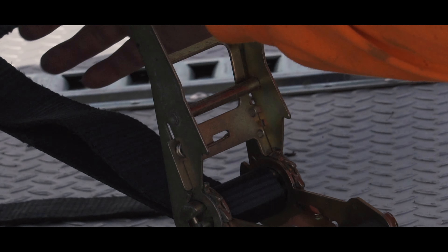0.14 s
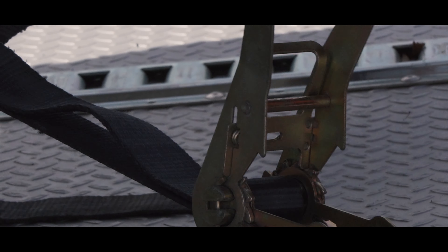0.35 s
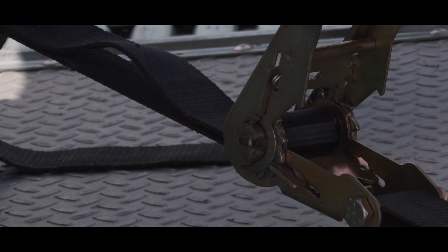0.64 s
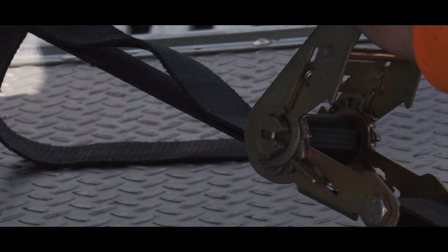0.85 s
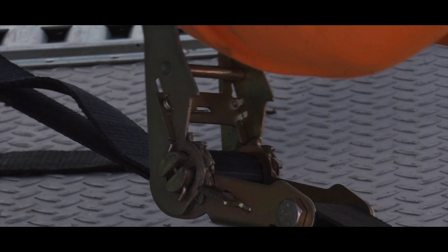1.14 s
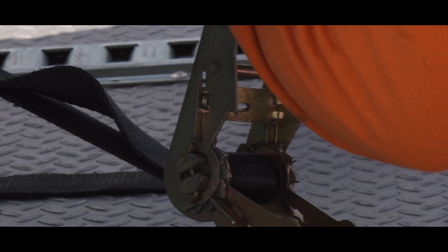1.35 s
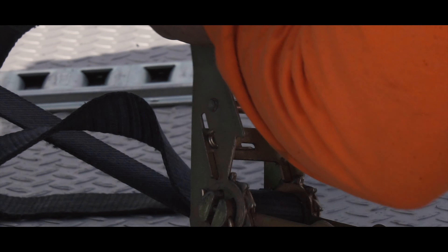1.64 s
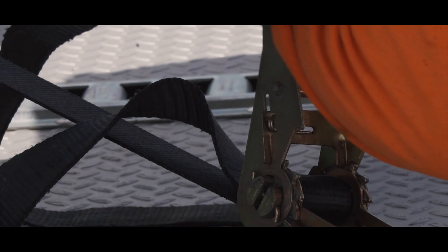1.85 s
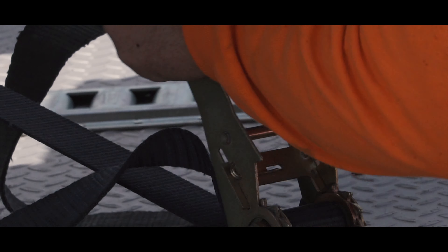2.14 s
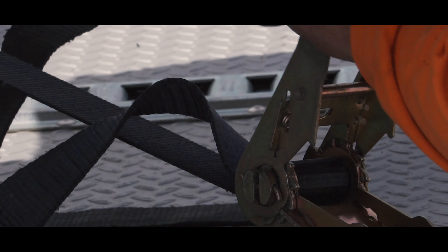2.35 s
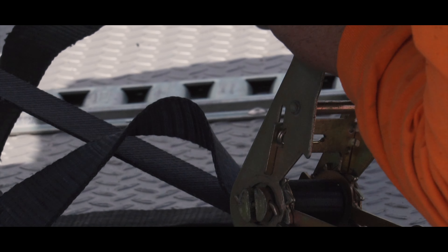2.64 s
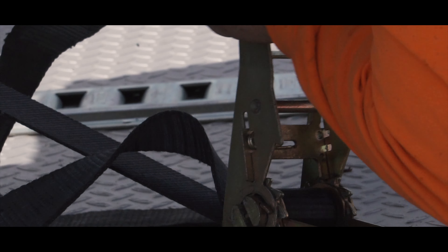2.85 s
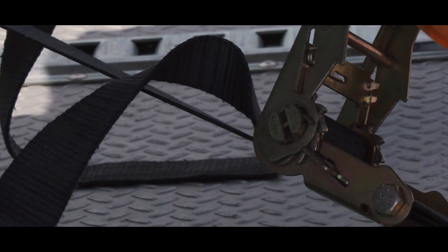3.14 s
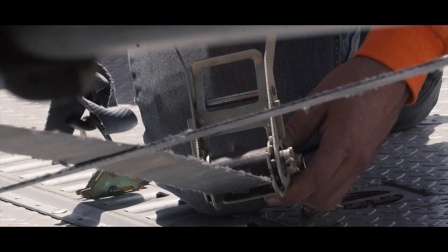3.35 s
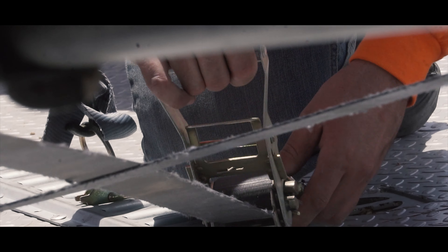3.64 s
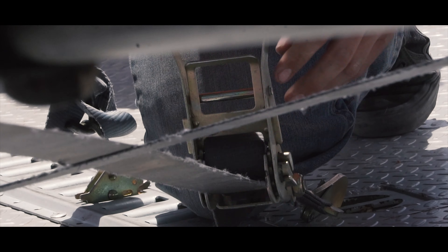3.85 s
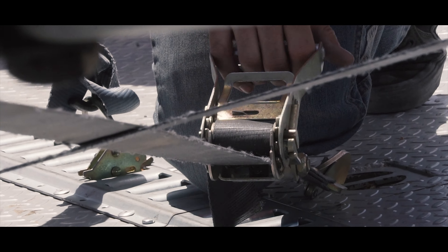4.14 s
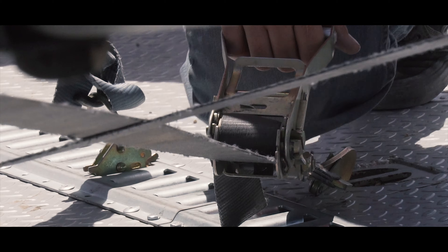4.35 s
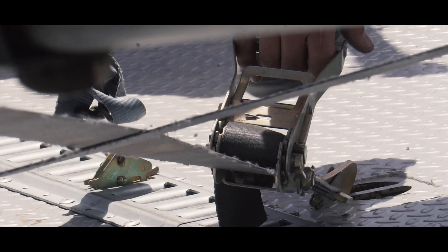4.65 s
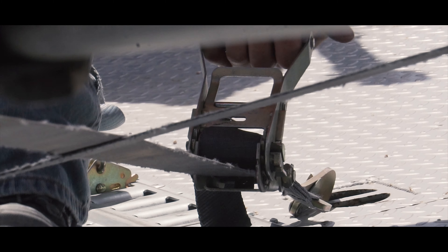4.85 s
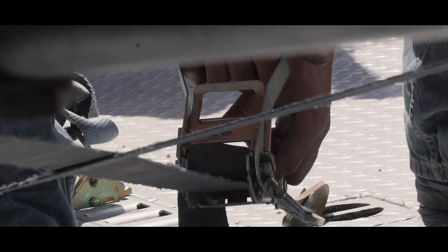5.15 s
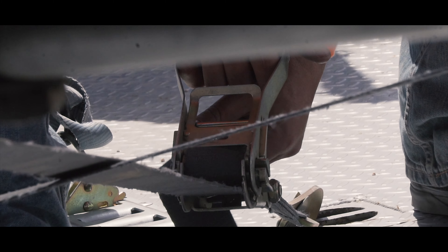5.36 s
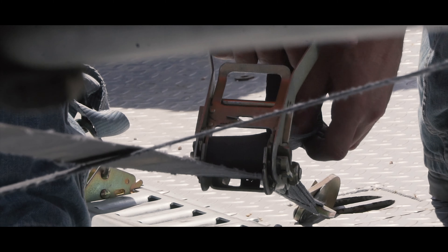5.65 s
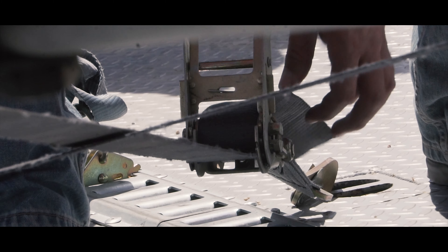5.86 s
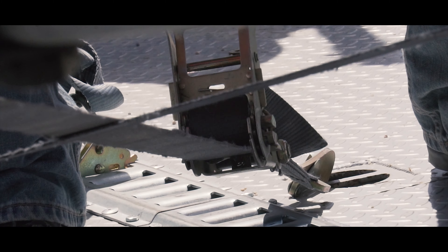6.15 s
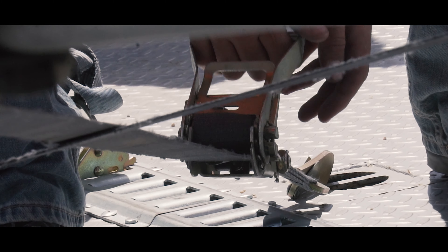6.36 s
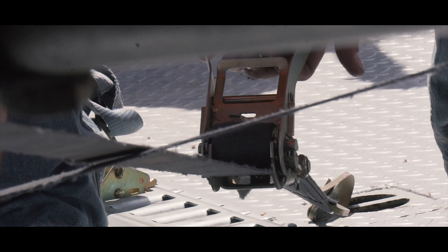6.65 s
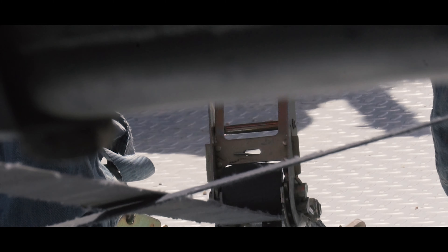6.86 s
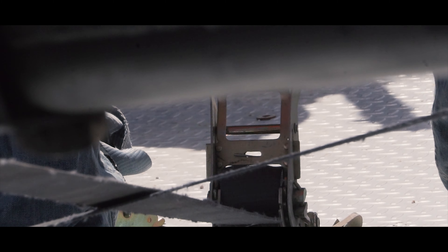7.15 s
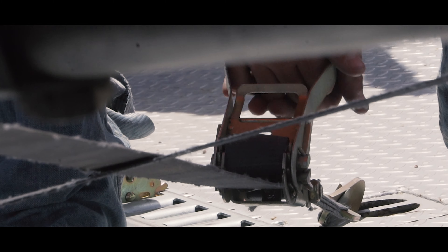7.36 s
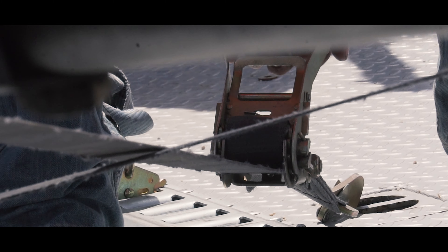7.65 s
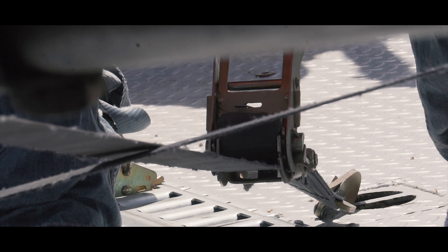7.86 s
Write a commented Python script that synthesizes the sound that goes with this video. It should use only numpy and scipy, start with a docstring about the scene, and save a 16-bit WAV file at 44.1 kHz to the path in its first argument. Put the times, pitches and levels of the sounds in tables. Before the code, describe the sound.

Outdoors in strong low wind buffeting, a close ratchet clatters, squeaks and clanks, then after a pop a second ratchet clicks more sparsely.

```python
"""On the steel deck of a trailer in a windy yard, two ratchet straps are cranked tight, one after the other.
Pawls (sprung catches) chatter over teeth: random bursts excite decaying tones and noise for the steel frames.
Squeaks are gliding tones, webbing creaks and rasps are tiny random slips, and sheet metal clanks.
Shaped noise makes the wind, with its gusts, lulls and thumps, a soft rustling and the distant yard."""
import sys
import numpy as np
from scipy import signal
from scipy.fft import rfft, irfft, next_fast_len
from scipy.io import wavfile
from scipy.ndimage import uniform_filter1d

SR = 44100
rng = np.random.default_rng(int(sys.argv[2]) if len(sys.argv) > 2 else 0)


def to_wav(sig):
    """Store sig (one row per channel, or 1-D mono) as 16-bit WAV at the path in sys.argv[1].

    Samples outside -1..1 are clipped; the rate is SR.
    """
    pcm = np.clip(np.atleast_2d(sig), -1, 1) * 32767
    pcm = np.round(pcm).astype(np.int16)
    wavfile.write(sys.argv[1], SR, pcm.T)  # frames by channels


N = 353682
TIME = np.arange(N) / SR
RING = TIME[:SR // 2]  # the half second given to each struck sound
TOP_HZ = 15850  # the treble is cut above this
DRAG_LEAD_S, DRAG_S = .008, 0.035  # the pawl drags over the teeth from just before each blow until after it
# eddy level at a given wind strength, and the dB that eddies gain per dB of wind
EDDY_DB, AT_WIND_DB, EDDY_GROWTH = -27, -15, 1.37

# base strength of the slow wind pressure: time_s, relative_level_db
WIND = [(0.0, -15), (0.42, -17), (0.59, -15.5), (1.1, -23), (1.2, -9), (1.49, -13.5), (1.74, -9.5),
        (3.29, -7), (3.34, -20), (3.8, -13.5), (4.45, -15.5), (4.83, -13.5), (5.31, -14.5), (5.98, -17),
        (6.52, -15), (7.13, -10), (7.8, -17), (8.02, -11.5)]
# gusts and lulls on top: crest_s, length_s, pressure_change_db, eddies_change_db
GUSTS_AND_LULLS = [(0.344, 0.56, 9.5, 12.5), (.95, 0.11, 2.5, 14.5), (1.457, 0.27, 2, -2),
                   (2.0, 0.15, -1.5, 6.5), (2.365, 0.18, 1, 6.5), (2.607, 0.18, 5, 1), (2.835, 0.086, 2, 4),
                   (3.13, .22, -4.5, 7.5), (3.573, 0.28, 2.5, 10), (4.25, 0.23, 4, -4),
                   (4.72, 0.58, 4.5, 5.5), (5.556, 0.25, 9.5, 13.5), (6.145, 0.24, 10, 7.5),
                   (6.47, 0.49, 3.5, 7.5), (7.02, 0.29, 4, 5), (7.612, 0.33, 2.5, 9), (7.99, 0.43, 4, 7.5)]
# tone of the slow, large eddies: pitch_hz, level_db
BUFFET = [(3, -26), (10, -1), (20, 1), (34, -2.5), (50, -7.5), (70, -18), (16000, -200)]
# tone of the small eddies: pitch_hz, level_db
EDDIES = [(30, -18), (60, -1), (85, 0), (125, -8), (300, -23), (450, -33), (16000, -122)]
# tone of the distant yard: pitch_hz, level_db
YARD = [(180, -20), (340, -6), (502, -13.5), (1150, -14), (1850, -27), (2650, -21), (3700, -32.5),
        (4800, -36.5), (7500, -51), (16000, -53.5)]
# loudness of the yard, before it wavers: time_s, level_db
YARD_LEVEL = [(0, -35.5), (3.25, -37.5), (3.35, -42), (8, -44)]
# blows of the nearer pawl: start_s, relative_peak_db, relative_treble_db, favoured_pitch_hz
NEAR_BLOWS = [(.063, -35, -1, 3220), (.117, -26, -13.5, 2940), (.165, -39.5, -7, 3830),
              (.405, -30, 6, 5300), (.456, -29.5, -2, 5100), (.523, -31.5, -14, 4500),
              (1.125, -37, -3, 3480), (1.16, -18.5, -9.5, 2340), (1.23, -19, -19, 2580),
              (1.238, -16, -5, 3030), (1.244, -11, -1.5, 3240), (1.317, -18.5, -9, 2300),
              (1.324, -26, -6, 3030), (1.391, -23, -5, 2700), (1.429, -24, -11, 4530),
              (1.561, -11.5, -1.5, 3800), (1.647, -29.5, -11.5, 2530), (1.713, -30.5, -7, 2450),
              (1.753, -10, -3.5, 3240), (1.869, -30.5, 1.5, 2800), (1.919, -22, -0.5, 3250),
              (1.951, -29, -3, 2350), (2.033, -11.5, -1, 3200), (2.13, -29, -4.5, 4080),
              (2.221, -22, -2, 3170), (2.228, -12, -5, 5350), (2.317, -31.5, -4.5, 3500),
              (2.335, -25.5, -1, 2960), (2.365, -24.5, -13.5, 3600), (2.466, -13.5, -0.5, 3220),
              (2.699, -27.5, -1, 2900), (2.992, -13, -2.5, 3400), (3.007, -19.5, -13, 2900),
              (3.121, -23, -7.5, 3000), (3.189, -33, -10, 3100)]
# blows of the farther pawl: start_s, relative_peak_db, relative_treble_db, favoured_pitch_hz
FAR_BLOWS = [(3.297, -25, 0.5, 5000), (3.393, -44, -9, 2980), (3.478, -37.5, -2, 4370),
             (3.494, -28.5, -6, 4500), (3.504, -23.5, -4.5, 2700), (3.605, -35.5, -7, 3240),
             (3.626, -27.5, -11, 4500), (3.635, -26, -2.5, 2700), (3.805, -34.5, -9.5, 3060),
             (3.978, -44.5, -18, 2800), (4.065, -18.5, -5, 2840), (4.135, -23.5, 1, 3430),
             (5.083, -31, -5.5, 2670), (5.106, -25.5, -19.5, 2830), (5.327, -36, -5.5, 3570),
             (5.422, -42.5, -4, 4430), (5.675, -39, -9, 4570), (5.698, -29, -2.5, 3130),
             (5.918, -40.5, -10, 3700), (5.947, -32.5, -3, 2840), (5.965, -28, -6.5, 2700),
             (6.202, -37.5, -16, 3650), (6.43, -27.5, -12, 2600), (6.442, -20.5, -6.5, 3100),
             (6.677, -39, -9, 4000), (6.719, -43, -12, 4800), (6.957, -36.5, -8, 3460),
             (6.976, -25.5, -9, 2750), (6.991, -29.5, -12, 2970), (7.136, -39, -6, 3250),
             (7.325, -46.5, -5, 2860), (7.458, -22.5, -3.5, 4470), (7.647, -45, -11, 4600),
             (7.667, -36, -11, 2040), (7.705, -40.5, -15, 3560)]
# strong rings (modes) of each frame, before chance varies them: pitch_hz, level_db, fall_by_60_db_s
NEAR_MODES = [(1202, 2.5, 0.057), (2372, 5.5, 0.054), (2558, 4.5, 0.051), (2860, 1, 0.086),
              (3143, -2, 0.083), (4400, -7.5, 0.096), (5230, -2.5, 0.055), (9600, -0.5, 0.042),
              (11430, 2.5, 0.033), (13000, 8, 0.026)]
FAR_MODES = [(2050, -9.5, .14), (2720, 1, 0.1), (2928, 4.5, 0.056), (3157, 1.5, .07), (3470, -6.5, 0.089),
             (4580, 0, 0.093), (5060, -2.5, 0.1), (7850, -5, 0.088), (10480, 2, 0.039), (12420, 3, 0.042)]
# tone of the dense, quickly fading rest of each frame: pitch_hz, level_db
NEAR_CRACK = [(300, -6), (1000, -23.5), (1900, -7.5), (3000, 5), (5300, 3), (6800, -2.5), (9000, -3.5),
              (12700, -6), (16000, -10)]
FAR_CRACK = [(300, -29), (1000, -37), (1700, -15), (2900, 5.5), (3700, 0), (5000, -1), (7000, -8),
             (9000, -8.5), (13000, -9.5), (16000, -20)]
# the nearer handle swinging back and scraping over its wheel: start_s, length_s, level_db
NEAR_SCRAPES = [(.342, 0.105, -31.5), (1.25, 0.051, -37.5), (1.33, 0.2, -46), (1.69, 0.02, -33.5),
                (1.738, 0.039, -40), (1.865, 0.059, -35.5), (2.15, 0.14, -34.5), (2.315, 0.025, -35.5),
                (2.905, 0.17, -41)]
# the farther handle doing the same: start_s, length_s, level_db
FAR_SCRAPES = [(5.05, 0.058, -39.5), (6.38, 0.069, -40.5), (6.417, 0.028, -28.5), (6.665, 0.05, -43.5)]
# tone of the echo: pitch_hz, level_db
ECHO = [(200, 15), (1200, 7), (3000, -1.5), (5000, -12.5), (16000, -57)]
# squeaks of dry pivots, and the clear tones within the webbing creaks:
# start_s, length_s, start_pitch_hz, end_pitch_hz, level_db, pitch_scatter_share
SQUEAKS = [(0.102, 0.035, 2260, 2540, -27.5, 0.026), (0.347, 0.035, 3680, 3420, -24, 0.044),
           (0.365, 0.11, 3480, 2855, -31.5, 0.046), (0.4, 0.035, 2633, 2540, -21.5, 0.018),
           (1.153, 0.038, 2270, 2610, -19, 0.075), (1.155, 0.025, 4270, 4440, -21.5, 0.015),
           (1.738, 0.029, 1100, 1270, -18, 0.04), (1.863, 0.062, 2790, 3370, -28, 0.085),
           (2.177, 0.0684, 1323, 1537, -26, 0.02), (2.366, 0.049, 2200, 2760, -27, 0.09),
           (2.659, 0.038, 2780, 3000, -32.5, 0.06)]
# single eddies that thump on the microphone: centre_s, relative_level_db
PUFFS = [(.339, -30), (1.156, -26), (1.322, -25), (1.594, -19.5), (2.068, -26), (2.188, -23), (2.534, -21),
         (2.628, -23), (2.84, -23), (3.064, -21.5), (4.194, -24), (4.65, -21), (5.268, -23.5),
         (5.573, -20.5), (6.548, -19.5), (6.794, -26.5), (7.005, -17.5)]
# tone of each thump: pitch_hz, level_db
PUFF = [(30, -12), (120, 0), (250, -8), (400, -24), (16000, -130)]
# clanks of sheet metal, and the fuller body of some hard blows of the nearer pawl:
# start_s, peak_db, favoured_pitch_hz
CLANKS = [(0.632, -27, 985), (.776, -10.5, 1050), (.808, -16, 792), (.881, -12.5, 2500), (.927, -20, 2950),
          (1.243, -20.5, 1350), (1.314, -20, 550), (1.319, -24.5, 2000), (1.757, -24, 3100),
          (1.825, -26.5, 678), (1.934, -21.5, 620), (2.228, -22.5, 3000), (2.995, -24, 750),
          (3.122, -33, 1730)]
# rings of the sheet, before chance varies them: pitch_hz, level_db, fall_by_60_db_s
SHEET_MODES = [(396, -4, .6), (521, 0, .6), (623, -3, .5), (692, -4, .5), (753, -6, .45), (880, -2, .6),
               (1003, -5, .4), (1303, 0, .45), (1446, -5, .35), (1670, -6, .4), (2000, -6, .35),
               (2930, -7, .2)]
# tone of the crash of the sheet: pitch_hz, level_db
SHEET_CRASH = [(150, -27), (400, 22.5), (1300, 11), (2200, 3.5), (3700, -5), (5500, -31), (16000, -42.5)]
# webbing slipping round the drum: start_s, length_s, start_pitch_hz, end_pitch_hz, level_db
CREAKS = [(1.69, 0.14, 1050, 1390, -29.5), (2.136, 0.13, 1210, 1500, -28.5),
          (2.9, 0.094, 1490, 1350, -35.5)]
# rings of the deck under the farther ratchet, before chance varies them: pitch_hz, level_db, fall_by_60_db_s
DECK_MODES = [(270, -8, .3), (322, 0, .35), (370, 3, .38), (425, -1, .3)]
# soft, dull rustling, before its level flutters: start_s, length_s, level_db
RUSTLES = [(4.549, 0.81, -47.5), (5.44, 0.14, -47), (6.732, 0.25, -51)]
# tone of the rustling: pitch_hz, level_db
RUSTLE_TONE = [(250, 2), (800, -2), (4000, -18.5), (16000, -47.5)]
# tone of webbing dragged through the farther ratchet: pitch_hz, level_db
RASP = [(400, -6), (1000, 0.5), (1600, -4), (2700, -0.5), (3900, -16.5), (8000, -39)]


def undb(db):
    """Turn decibels into a gain."""
    return 10 ** (np.asarray(db) / 20)


def unit(x):
    """Scale a sound to an average (rms) strength of 1."""
    return x / np.sqrt(np.mean(x ** 2))


def curve(rows):
    """Join the points of a two-column table by straight lines in time."""
    times, values = np.transpose(rows)
    return np.interp(TIME, times, values)


def colour(x, points):
    """Shape the tone by (pitch_hz, level_db) points, without any sound arriving early."""
    size = 2 * next_fast_len(len(x) // 2 + 2048, True)
    hz, db = np.transpose(points)
    bins_hz = np.fft.rfftfreq(size, 1 / SR)
    wanted_db = np.interp(np.log(bins_hz + 1), np.log(hz), db)
    # folding the cepstrum gives the filter that responds soonest
    cepstrum = irfft(np.log(undb(wanted_db)))
    cepstrum[1:size // 2] *= 2
    cepstrum[size // 2 + 1:] = 0
    return irfft(rfft(x, size) * np.exp(rfft(cepstrum)))[:len(x)]


def noise(points):
    """Noise of a given tone, with an rms strength of 1."""
    return unit(colour(rng.standard_normal(N), points))


def walk(rate):
    """A smooth random drift with an rms of 1, given `rate` new values per second."""
    step = int(SR / rate)
    values = np.repeat(rng.standard_normal(N // step + 1), step)
    return unit(uniform_filter1d(values, step)[:N])


def fade(t60):
    """Die away smoothly, by 60 dB in t60 seconds."""
    return np.exp(-np.log(1000) * RING / max(t60, .001))


def loudest(x, db):
    """Set the level of the loudest 4 milliseconds."""
    return x * undb(db) / np.sqrt(uniform_filter1d(x ** 2, size=176).max())


def add(track, s, x):
    """Mix a sound into a track at a time in seconds."""
    i = max(int(s * SR), 0)
    track[i:i + len(x)] += x[:N - i]


def wind_levels():
    """Pressure and eddies in dB: both follow the wind, eddies more steeply; gusts and lulls change both."""
    pressure = curve(WIND)
    eddies = EDDY_DB + EDDY_GROWTH * (pressure - AT_WIND_DB)
    for s, seconds, pressure_change_db, eddies_change_db in GUSTS_AND_LULLS:
        shape = np.cos(np.pi * np.clip((TIME - s) / seconds, -.5, .5)) ** 2
        pressure = pressure + pressure_change_db * shape
        eddies = eddies + eddies_change_db * shape
    return pressure, eddies


def wind(buffet_db, eddy_db, flutter_db, coupling, heave_db):
    """Large eddies push the microphone slowly; small ones spurt when that push is strong either way."""
    buffet = noise(BUFFET)
    # even out both layers first, so that the wind tables set their loudness
    buffet /= np.sqrt(uniform_filter1d(buffet ** 2, size=5000))
    eddies = noise(EDDIES) * undb(flutter_db * walk(30)) * (1 + coupling * buffet ** 2)
    eddies /= np.sqrt(uniform_filter1d(eddies ** 2, size=5000))
    pressure, spurts = wind_levels()
    slow_push = buffet * undb(pressure + buffet_db + heave_db * walk(14))
    return slow_push + eddies * undb(spurts + eddy_db)


def yard():
    """Distant machines, traffic and open air blend into a shaped noise that wavers a little."""
    return noise(YARD) * undb(curve(YARD_LEVEL) + walk(6))


def grit(seconds, density):
    """A swell of tiny grains of uneven size, with `density` larger ones per second, as in rubbing."""
    n = int(seconds * SR)
    size, chance = rng.standard_normal(N)[:n], rng.random(N)[:n]
    large = chance < density / SR
    return unit(size * (0.23 + large)) * signal.windows.tukey(n, .5)


def drags(blows, drag_db):
    """The harder the blow, the louder the pawl drags over the teeth."""
    return [(s - DRAG_LEAD_S, DRAG_S, db + drag_db) for s, db, _, _ in blows]


def scrapes(rows, crack, ticks_per_s, treble_db, drag):
    """Steel drags on steel, catches on burrs and sounds through the frame."""
    out = np.zeros(N)
    catches = (rng.random(N) < ticks_per_s / SR) * rng.random(N)
    grip = drag + signal.fftconvolve(catches, fade(.03))[:N]
    for s, seconds, db in rows:
        slips = grit(seconds, density=2700)
        add(out, s, undb(db) * unit(slips * grip[int(s * SR):][:len(slips)]))
    # each slip rings on briefly in the frame
    frame = rng.standard_normal(len(RING)) * fade(.09)
    ringing = signal.fftconvolve(out, frame)[:N]
    rung = colour(unit(out) + .5 * unit(ringing), crack)
    rung = colour(rung, [(3500, 0.008), (8000, treble_db)])
    return unit(rung) * np.std(out)


def ring(modes, scatter_db, detune):
    """A struck part sounds several fading tones; each blow varies their strength, pitch and phase."""
    out = 0
    chances = rng.standard_normal((len(modes), 3))
    for (hz, db, t60), (size, shift, turn) in zip(modes, chances):
        tone = np.sin(2 * np.pi * (hz * (1 + detune * shift) * RING + turn))
        out = out + undb(db + scatter_db * size) * fade(t60) * tone
    return unit(out)


def chatter(seconds, skid_db):
    """The pawl skids off the tooth, strikes and rebounds in a few milliseconds of random hits."""
    size, chance = rng.standard_normal(len(RING)), rng.random(len(RING))
    age = RING / max(seconds, .0005)
    strength = age ** 2 * np.exp(-age) + undb(skid_db) * np.exp(-age / 3)
    return size * (chance < 6000 / SR) * strength  # about 6000 chances of a hit per second


def ratchet(blows, modes, crack, crack_t60, snap, ring_db, gain_db, treble_db, chatter_s, focus_db, detune):
    """The sprung pawl drops off a tooth, chatters on the wheel and rings the frame."""
    out = np.zeros(N)
    for s, db, bright_db, hz in blows:
        # a fast fade and a slower one together make the dense rings drop quickly at first
        dense = rng.standard_normal(len(RING)) * (fade(crack_t60) + snap * fade(crack_t60 / 5))
        hits = chatter(chatter_s, skid_db=-14)
        click = unit(colour(signal.fftconvolve(hits, dense)[:len(RING)], crack))
        # the strong rings build up while the pawl chatters
        build_up = np.cumsum(hits ** 2)
        click += undb(ring_db) * unit(ring(modes, scatter_db=4, detune=detune) * build_up)
        # the handle's position favours one resonance; a harder contact carries more treble
        click = colour(click, [(hz / 1.12, 0), (hz, focus_db), (hz * 1.12, 0)])
        click = colour(click, [(3500, 0), (8000, treble_db + bright_db)])
        add(out, s, loudest(click, db + gain_db))
    return out


def surroundings(x, t60, wet_db):
    """The deck, the load and nearby walls send back dull reflections, made as a fading noise tail."""
    tail = colour(rng.standard_normal(len(RING)) * fade(t60) * (1 - fade(.05)), ECHO)
    tail = tail / np.sqrt(np.sum(tail ** 2))
    return undb(wet_db) * signal.fftconvolve(x, tail)[:N]


def squeaks(octave_db, flutter_db):
    """Dry pivots and creaking webbing stick and slip: a gliding, unsteady tone with its octave."""
    out = np.zeros(N)
    for s, seconds, start_hz, end_hz, db, scatter in SQUEAKS:
        n = int(seconds * SR)
        hz = np.linspace(start_hz, end_hz, n) * (1 + scatter * walk(900)[:n])
        phase = 2 * np.pi * np.cumsum(hz) / SR
        tone = np.sin(phase) + undb(octave_db) * np.sin(2 * phase)
        tone = tone * undb(flutter_db * walk(250)[:n])
        add(out, s, undb(db) * unit(tone) * signal.windows.tukey(n, .7))
    return out


def puffs(seconds, gain_db):
    """Single eddies hit the microphone, each a short, soft thump."""
    out = np.zeros(N)
    air, n = noise(PUFF), int(seconds * SR)
    for s, db in PUFFS:
        start = s - seconds / 2
        thump = air[int(start * SR):][:n] * np.hanning(n)
        add(out, start, undb(db + gain_db) * unit(thump))
    return out


def clanks(crash_t60, ring_db, swell_s, slope_db):
    """Sheet metal clanks, and some pawl blows gain body: a crash of noise over ringing modes."""
    out = np.zeros(N)
    for s, db, hz in CLANKS:
        plate = unit(colour(rng.standard_normal(len(RING)) * fade(crash_t60), SHEET_CRASH))
        plate += undb(ring_db) * ring(SHEET_MODES, scatter_db=1.5, detune=.001)
        plate = colour(plate, [(hz / 4, slope_db), (hz, 0), (hz * 4, slope_db)])
        # the point of contact gives a brighter smack
        smack = rng.standard_normal(len(RING)) * fade(0.13)
        smack = colour(smack, [(1500, 4.5), (3500, 6.5), (5500, -14.5), (16000, -49.0)])
        clank = (plate + undb(-8) * unit(smack)) * (1 - fade(swell_s))
        add(out, s, loudest(clank, db))
    return out


def creaks(density, judder_db, drum_t60, overtone, overtone_db):
    """Loaded webbing slips in jerks that ring the drum, whose resonances glide as the load changes."""
    out = np.zeros(N)
    for s, seconds, start_hz, end_hz, db in CREAKS:
        slips = grit(seconds, density)
        n = len(slips)
        slips = slips * undb(judder_db * walk(144)[:n])
        phase = 2 * np.pi * np.cumsum(np.linspace(start_hz, end_hz, n)) / SR
        rings = []
        for ratio in (1, overtone):
            # turning the slips back, smearing them and turning forward makes a gliding resonance
            turn = np.exp(1j * ratio * phase)
            smeared = signal.fftconvolve(slips / turn, fade(drum_t60))[:n]
            rings.append(unit((turn * smeared).real))
        low, high = rings
        add(out, s, undb(db) * (low + undb(overtone_db) * high) * signal.windows.tukey(n))
    return out


def pop(s, db, t60):
    """A dry pop at the join where one stretch of wind is cut to another: a level that grows, then stops dead."""
    out = np.zeros(N)
    add(out, s - len(RING) / SR, undb(db) * fade(t60)[::-1])
    return out


def deck(gain_db, share, thud_db):
    """The taut strap hands the farther pawl's blows on to the deck, more as it tightens."""
    out = np.zeros(N)
    for s, db, _, _ in FAR_BLOWS:
        thud = rng.standard_normal(len(RING)) * fade(.32)
        thud = unit(colour(thud, [(150, -15), (380, 0), (1100, -7), (2800, -17), (16000, -75)]))
        answer = ring(DECK_MODES, scatter_db=2.5, detune=0.017) + undb(thud_db) * thud
        answer = answer * (1 - fade(0.0028))  # soften the onset
        tension_db = np.interp(s, [4.3, 5], [-8, 0])
        # only a share of each blow's difference in dB reaches the deck
        add(out, s, loudest(answer, share * db + gain_db + tension_db))
    return out


def rustles(flutter_db):
    """A soft rustle of uneven grains comes and goes."""
    out = np.zeros(N)
    for s, seconds, db in RUSTLES:
        add(out, s, undb(db) * unit(colour(grit(seconds, density=900), RUSTLE_TONE)))
    return out * undb(flutter_db * walk(20))


def rasp(s, seconds, db, swell_db):
    """Webbing slides over steel in a fine, even rasp that swells until the handle stops."""
    out = np.zeros(N)
    slips = grit(seconds, density=6000)
    swelling = slips * undb(np.linspace(0, swell_db, len(slips)))
    add(out, s, undb(db) * unit(colour(swelling, RASP)))
    return out


def scene():
    """Both ratchets with their squeaks, creaks and clanks, in the windy yard."""
    near = ratchet(NEAR_BLOWS, NEAR_MODES, NEAR_CRACK, crack_t60=0.076, snap=2.0, ring_db=-4.0,
                   gain_db=.5, treble_db=5, chatter_s=0.00069, focus_db=9, detune=.012)
    near += scrapes(NEAR_SCRAPES + drags(NEAR_BLOWS, drag_db=-18), NEAR_CRACK,
                    ticks_per_s=190, treble_db=-6.5, drag=0.27)
    far = ratchet(FAR_BLOWS, FAR_MODES, FAR_CRACK, crack_t60=0.084, snap=0.67, ring_db=-5.5,
                  gain_db=2.5, treble_db=5.0, chatter_s=0.00093, focus_db=6, detune=0.004)
    far += scrapes(FAR_SCRAPES + drags(FAR_BLOWS, drag_db=-11), FAR_CRACK,
                   ticks_per_s=150, treble_db=-9.5, drag=0.48)
    soft = squeaks(octave_db=-16.5, flutter_db=3.0)
    soft += creaks(density=620, judder_db=4.5, drum_t60=0.017, overtone=1.9, overtone_db=-9.5)
    soft += rasp(s=6.47, seconds=0.14, db=-38, swell_db=10)
    soft += rustles(flutter_db=3)
    steel = clanks(crash_t60=0.37, ring_db=-4, swell_s=0.034, slope_db=-14.5)
    steel += deck(gain_db=-10.5, share=.5, thud_db=-6)
    echo = surroundings(near, t60=.33, wet_db=-11)
    echo += surroundings(far + soft, t60=.35, wet_db=-12)
    air = wind(buffet_db=-1, eddy_db=.7, flutter_db=3, coupling=.5, heave_db=2.6)
    air += puffs(seconds=.075, gain_db=-1)
    air += yard()
    air += pop(s=3.297, db=-2, t60=.02)
    return (near + far + soft + steel + echo + air)[None]


def record(dry):
    """Peaks near full scale, as in strong gusts, overload and are rounded off; the top treble is cut."""
    clipped = dry / (1 + dry ** 12) ** (1 / 12)
    treble_cut = signal.ellip(10, .2, 80, TOP_HZ, fs=SR, output="sos")
    return signal.sosfilt(treble_cut, clipped)


dry = scene()
out = record(dry)
to_wav(out)
```